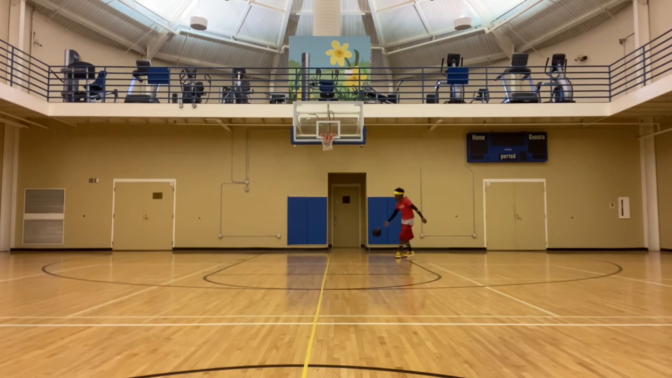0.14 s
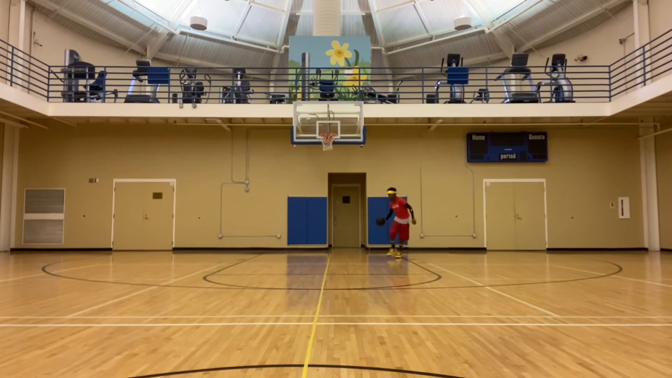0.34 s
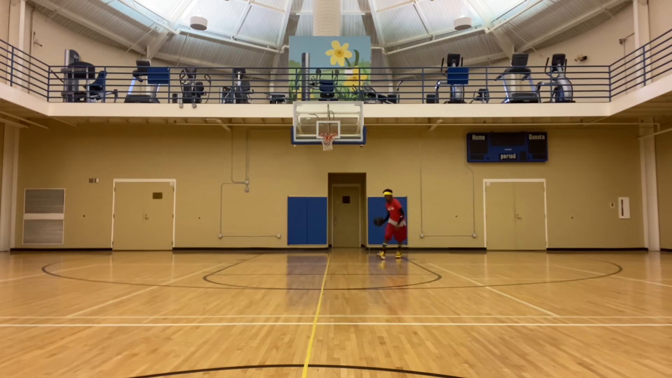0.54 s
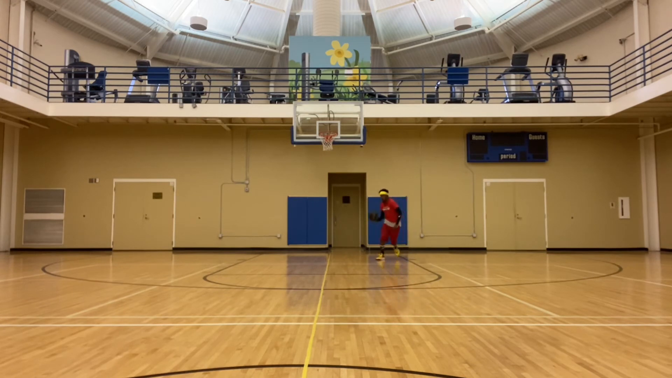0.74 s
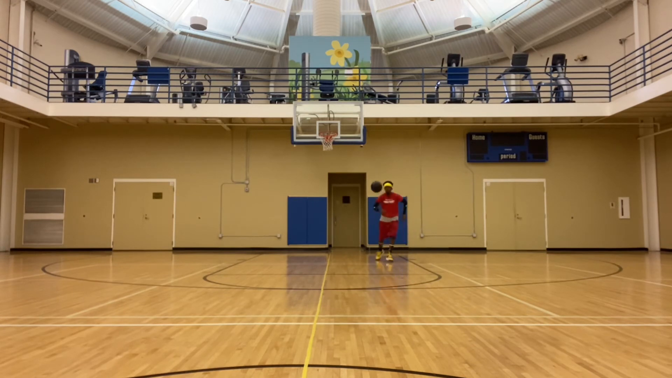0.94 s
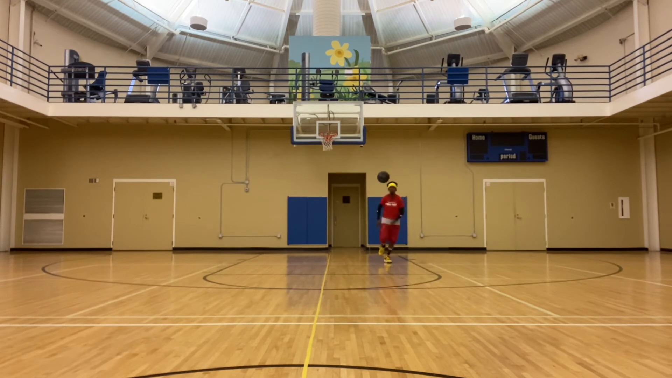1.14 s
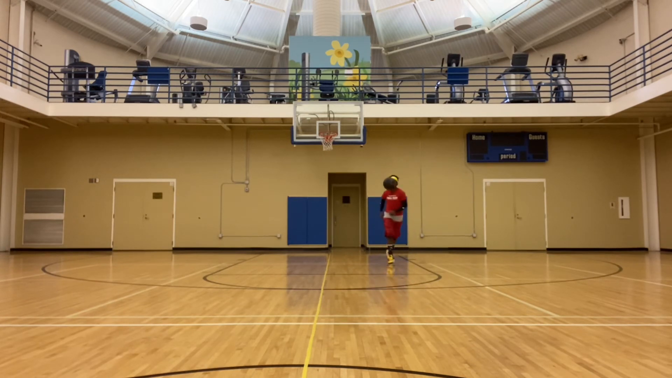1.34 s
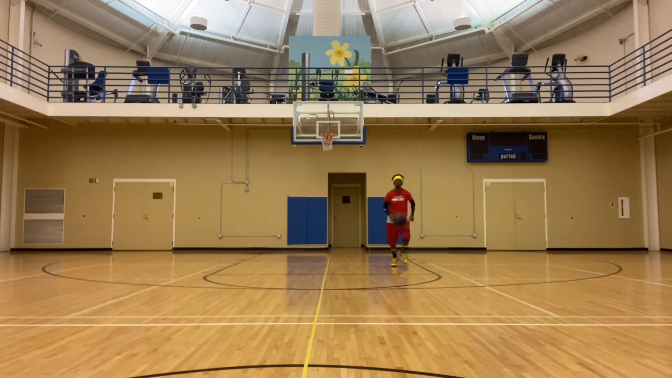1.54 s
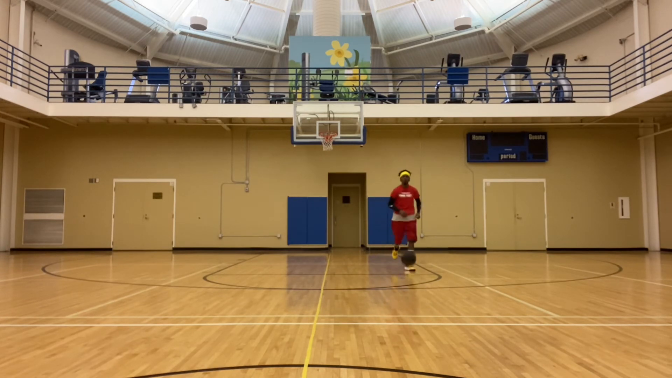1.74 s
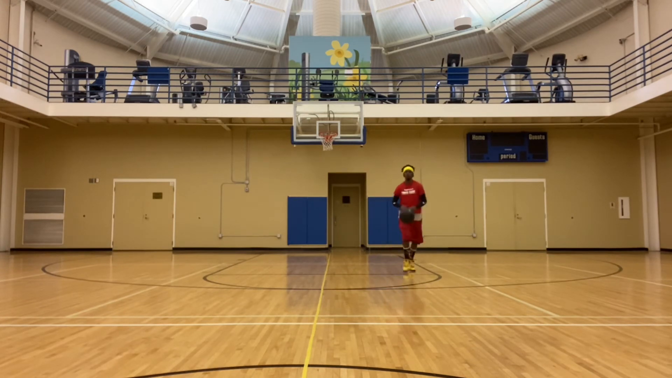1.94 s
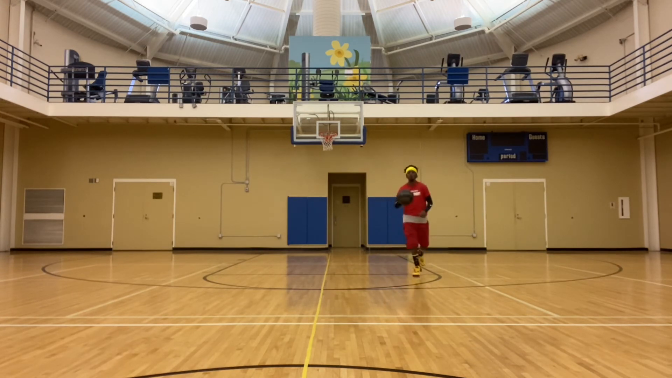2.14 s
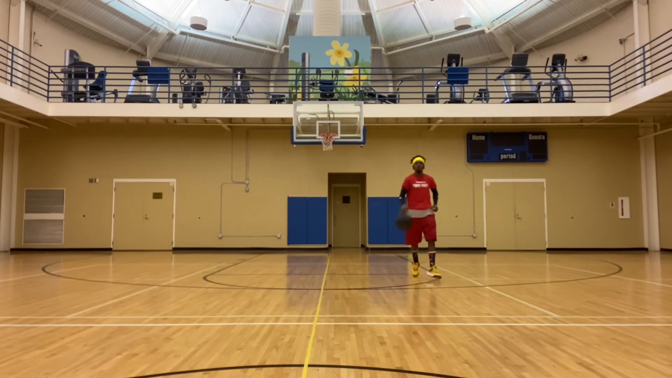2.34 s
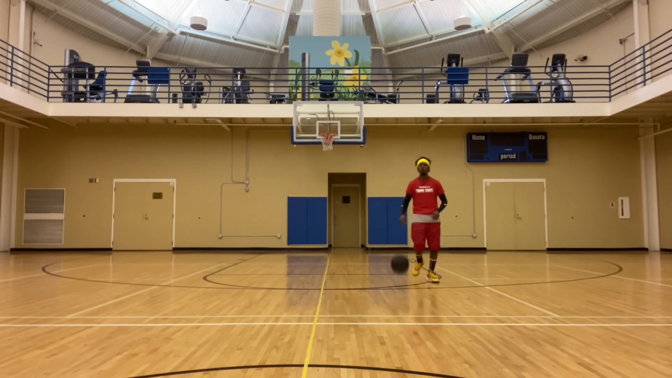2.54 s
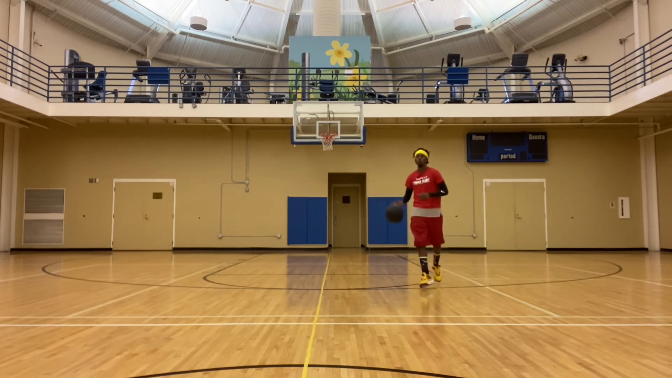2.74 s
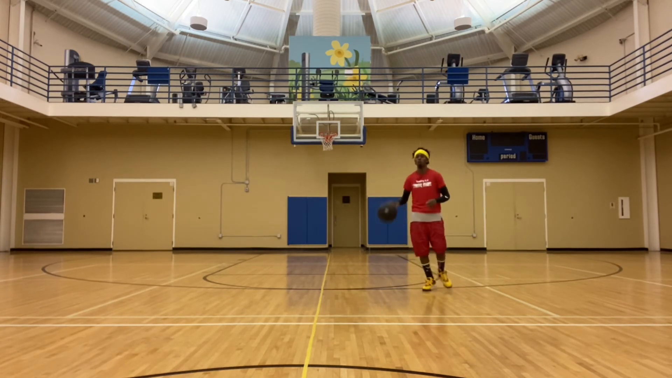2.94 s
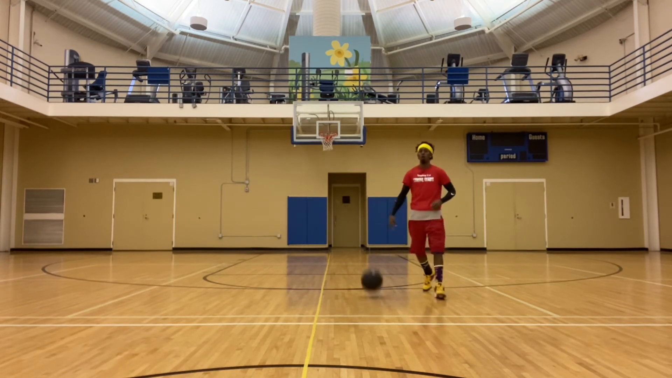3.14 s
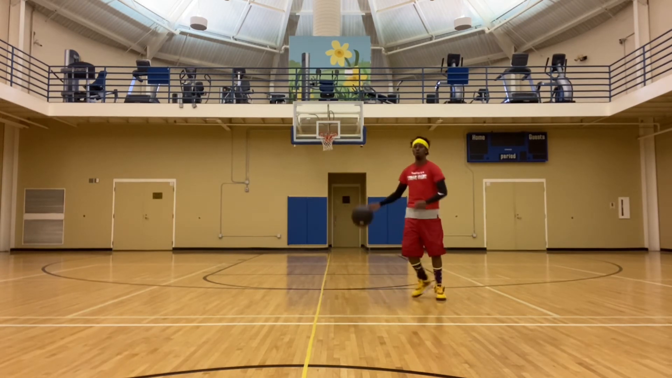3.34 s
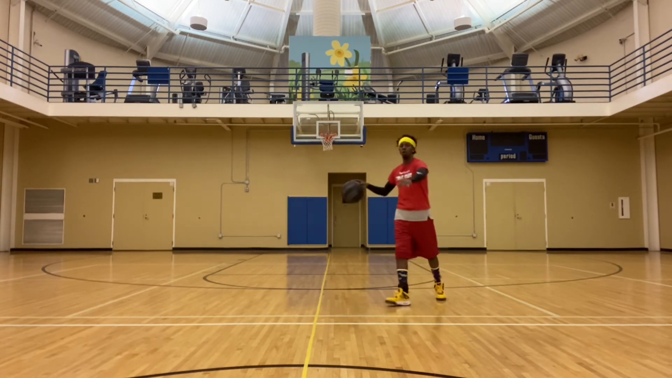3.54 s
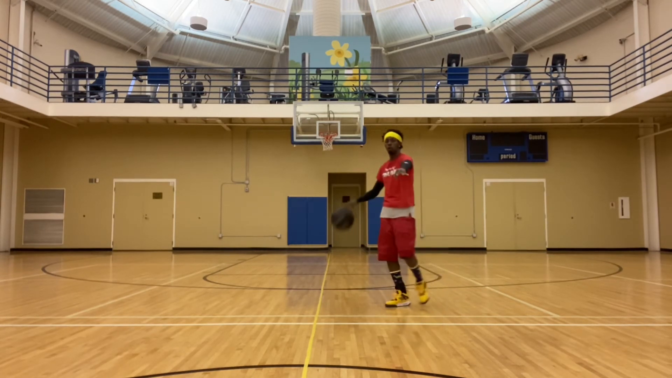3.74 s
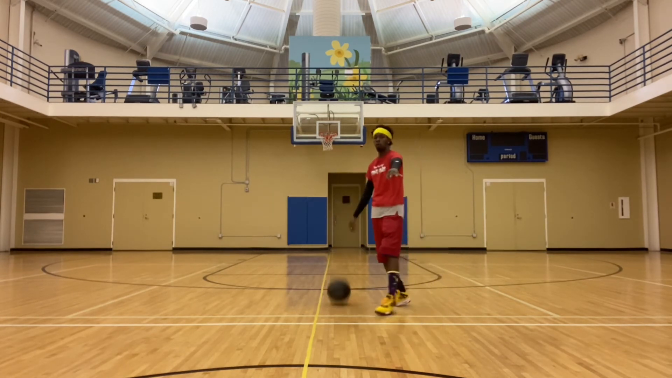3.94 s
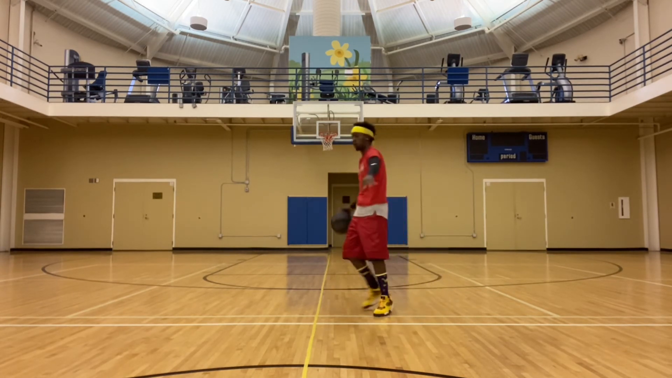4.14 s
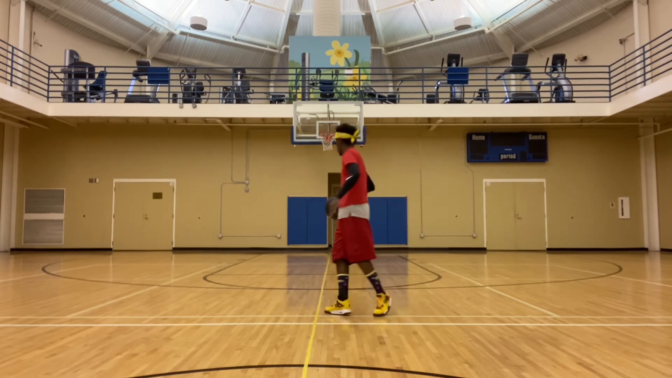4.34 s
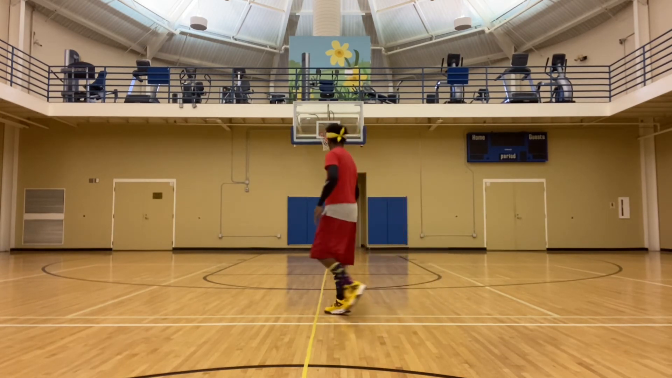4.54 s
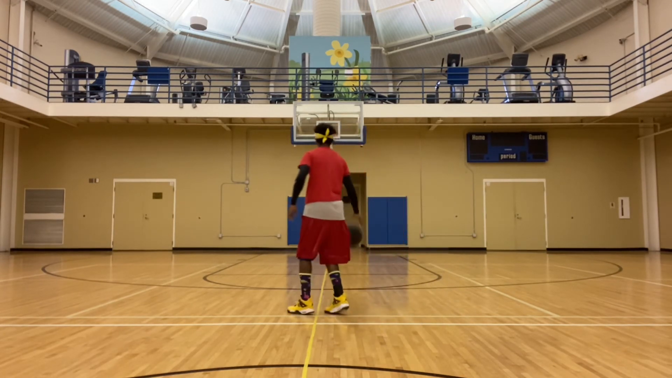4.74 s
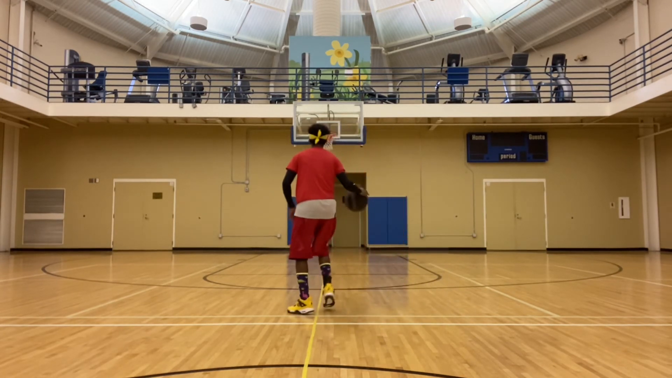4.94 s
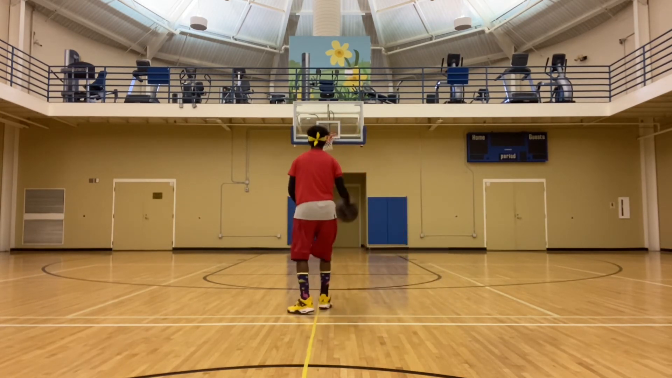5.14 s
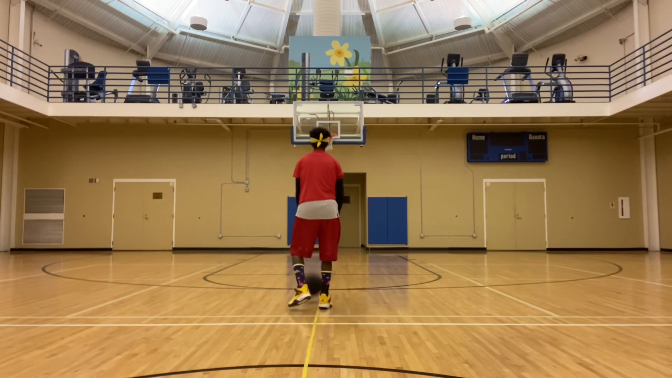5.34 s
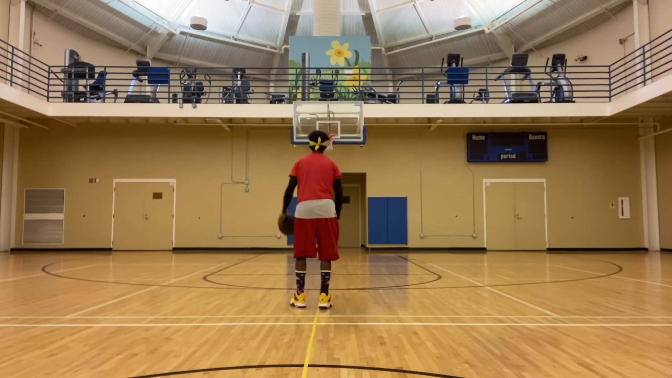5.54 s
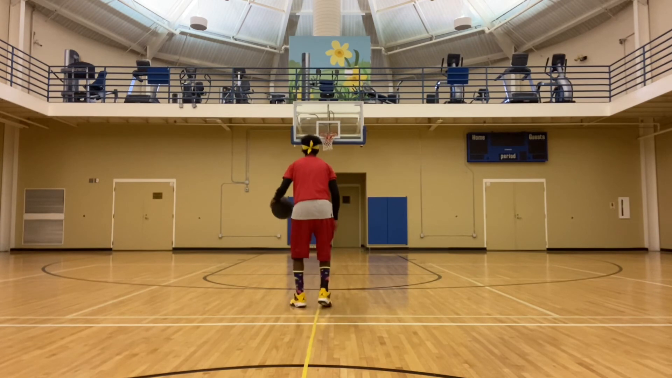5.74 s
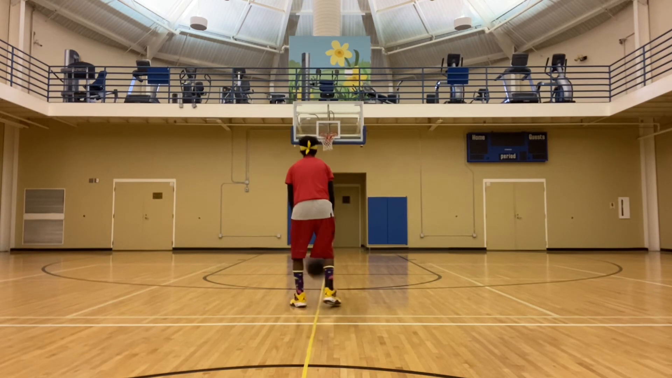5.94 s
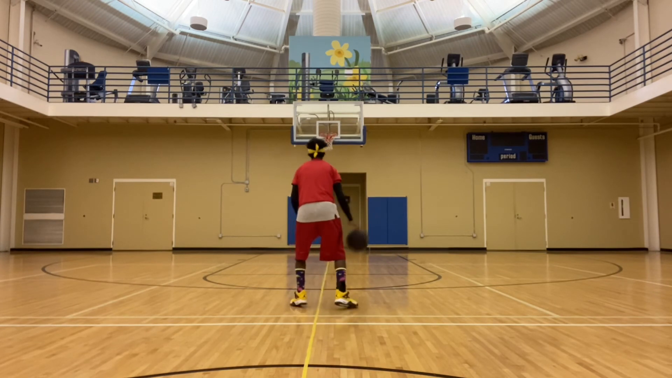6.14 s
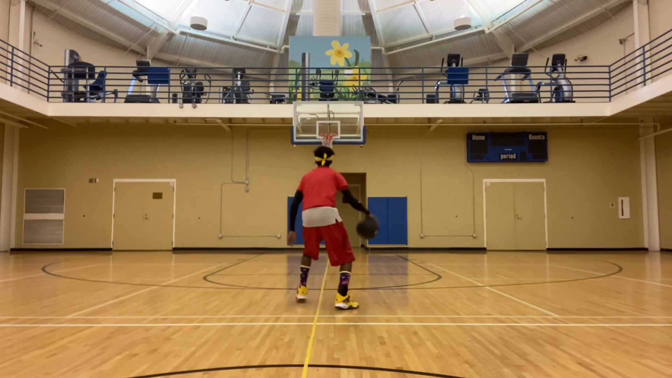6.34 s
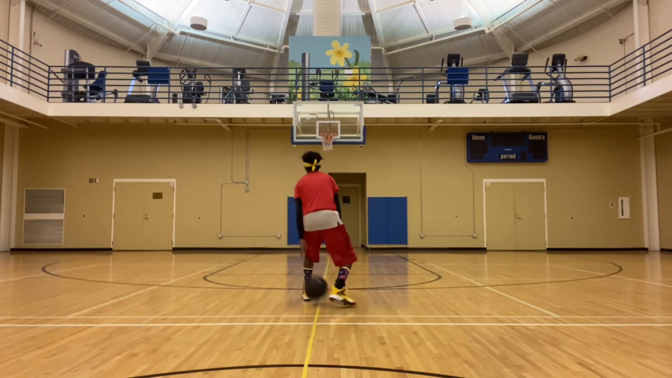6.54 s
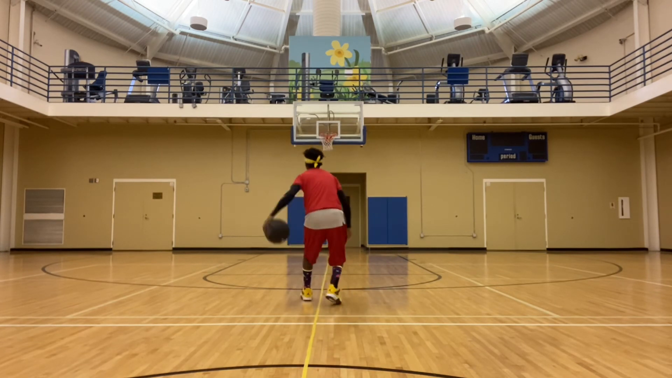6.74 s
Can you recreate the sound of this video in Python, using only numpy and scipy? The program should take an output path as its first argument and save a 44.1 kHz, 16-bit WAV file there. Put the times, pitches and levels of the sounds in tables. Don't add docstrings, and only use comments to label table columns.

```python
import sys
import numpy as np
from scipy import signal
from scipy.fft import rfft, irfft
from scipy.io import wavfile
from scipy.ndimage import uniform_filter1d

SR = 44100
rng = np.random.default_rng(int(sys.argv[2]) if len(sys.argv) > 2 else 0)


def output_pcm(signal):
    pcm = np.clip(np.atleast_2d(signal).T, -1, 1) * 32767
    wavfile.write(sys.argv[1], SR, np.round(pcm).astype(np.int16))


def natural_amplitude(level_db):
    exponent = np.asarray(level_db, float) / 20
    return 10 ** exponent


N = 303849

# start in seconds, slap level in dB, thump level in dB,
# level of the air ring in dB, pitch this bounce favours in Hz.
BOUNCES = [
    (1.6172, -10.5, -16, -23, 843),
    (2.4057, -8.5, -15.5, -27, 1100),
    (3.0276, -5, -15, -21, 1096),
    (3.818, -8, -14.5, -24, 980),
    (4.4843, -7.5, -14.5, -24.5, 1200),
    (5.227, -11.5, -17, -27, 1053),
    (5.898, -6, -16.5, -23, 1060),
    (6.4278, -3, -17.5, -30.5, 1230),
]
# start in seconds, bright tail in dB, boomy tail in dB.
WALL_ANSWERS = [
    (-.15, -34.5, -25.5),
    (1.643, -32, -20),
    (2.436, -34, -21.5),
    (3.062, -32.5, -20.5),
    (3.858, -36, -23.5),
    (4.52, -34.5, -23),
    (5.262, -37, -23),
    (5.933, -32.5, -23.5),
    (6.465, -36, -24),
]
# start in seconds, slap level in dB, ring level in dB.
END_WALL_ECHOES = [
    (1.679, -22, -33),
    (2.4705, -21.5, -32),
    (3.0992, -18, -22),
    (3.9028, -29, -25.5),
    (4.58, -22, -30),
    (5.326, -35, -31),
    (5.9794, -22.5, -21),
    (6.5088, -30, -29),
]
# start in seconds, peak in dB, centre in Hz,
# level of the bright part in dB, time to die by 60 dB in seconds.
TAPS = [
    (0.473, -35, 1010, -25, 0.0023),
    (1.286, -35.5, 1080, -24, 0.019),
    (1.333, -36.5, 1020, -20, 0.0032),
    (2.335, -27, 1050, -15, 0.012),
    (2.462, -22.5, 626, -30, 0.027),
    (2.679, -29, 1000, -26, 0.0052),
]
# centre in seconds, level in dB, length in seconds.
RUSTLES = [
    (1.203, -74, 0.02),
    (2.224, -73, 0.017),
    (3.751, -72, 0.03),
    (4.188, -65, 0.017),
    (4.953, -56, 0.013),
    (5.58, -77, 0.011),
]
# delay after the bounce in seconds, level against the thump in dB, pitch in Hz.
THUMP_RETURNS = [(0.071, -6, 81.2), (.111, -11, 81), (.141, -5.5, 82), (0.177, -10.5, 78),
                 (0.227, -8, 74.2), (0.282, -10.5, 64.7), (0.341, -17, 90), (.38, -10, 75.2),
                 (.42, -7.5, 74), (.469, -15, 77.3), (0.507, -13, 74.3), (.552, -16.5, 82.1)]

# pitch in Hz, level in dB, time to die by 60 dB in seconds.
BALL_AIR = [(982.6, 0.5, 0.046), (1198, -10, 0.034), (1568, -8, 0.038), (844, -4.5, 0.036),
            (557, -11, 0.029)]
BALL_SKIN = [(2000, -9, 0.0026), (3250, -1.5, 0.0019), (4930, 12, 0.00072), (7860, 3, 0.0018),
             (12450, -11, 0.00055)]
FIRST_TOUCH = [(4630, -4.5, 0.0006), (8100, 10, 0.00098), (12200, -11.5, 0.0014)]
SQUEEZED_AIR = [(2500, -1, 0.0011), (1480, -1, 0.0012)]
BOARDS = [(234, -20, .05), (338, 4, 0.065), (471, -6.5, 0.14), (596, -2, 0.072)]
FLOOR_BOOM = [(57.1, 0.5, 0.93), (70.5, -3.5, 1), (90, -4.5, 0.28)]

# pitch in Hz, level in dB per Hz.
TAIL_COLOUR = [(28, -24.5), (40, -21), (81, -6), (170, -8), (249, -16), (330, -21), (549, -30),
               (785, -38.5), (987, -36), (2000, -44.5), (4500, -46), (8000, -49), (12300, -60),
               (16000, -99)]
# pitch in Hz, time to die by 60 dB in seconds.
TAIL_T60 = [(40, 7), (110, 2.23), (280, 2.14), (740, 1.51), (1940, 1.825), (5120, 0.98), (9000, 0.58),
            (13500, 0.46)]
# pitch in Hz, likeness from 0 to 1.
LIKENESS = [(40, 1), (80, 0.95), (130, 0.55), (220, 0.65), (380, 0.31), (700, 0), (5000, 0), (9000, 0.36),
            (15000, 0.94)]
# pitch in Hz, level in dB per Hz.
VENTILATION = [(25, -30.5), (45, 2.5), (71, -0.5), (160, -3), (300, -15), (550, -23.5), (800, -30),
               (1210, -31.5), (1800, -43), (4000, -55.5), (8000, -60.5), (15000, -69.5)]

VENTILATION_DB = -41.5
PORT_LAG_MS = 0.044
EARLY_DB, EARLY_S, GRAIN_DB = 1, 0.023, 6
TAP_ROOM_DB, TAP_ROOM_S = -29, 0.03
TAP_ROOM_DULL_DB = -6.5
SETTLED_GAP_S = 0.03592


def at_hz(points, hz):
    pitches, values = np.array(points).T[:2]
    return np.interp(np.log(hz), np.log(pitches), values)


def ring(x, hz, t60):
    r = natural_amplitude(-60 / (max(t60, 2e-4) * SR))
    w = 2 * np.pi * hz / SR
    return signal.lfilter([0, np.sin(w)], [1, -2 * r * np.cos(w), r * r], x)


def struck(modes, spread_db, crackle, size=2000):
    blow = crackle * rng.standard_normal(size) * np.exp(-np.arange(size) / (0.0013 * SR))
    blow[0] -= 1
    sound = np.zeros(size)
    for hz, db, t60 in modes:
        sound += natural_amplitude(db + spread_db * rng.standard_normal()) * ring(blow, hz, t60)
    return sound / np.max(np.abs(sound))


def falling(start_hz, end_hz, fall_s, peak_s, sharp, turn):
    t = np.arange(3500) / SR
    turns = end_hz * t + (start_hz - end_hz) * fall_s * (1 - np.exp(-t / fall_s))
    swell = (t / peak_s * np.exp(1 - t / peak_s)) ** sharp
    return swell * np.cos(2 * np.pi * (turns + turn))


def add(out, sound, s, lag_ms=0., pan_db=0.):
    i = round(s * SR)
    lags = np.maximum([[lag_ms], [-lag_ms]], 0) / 1000
    delay = np.exp(-2j * np.pi * np.fft.rfftfreq(len(sound), 1 / SR) * lags)
    pair = irfft(rfft(sound) * delay, len(sound)) * natural_amplitude([[pan_db / 2], [-pan_db / 2]])
    out[:, i:i + len(sound)] += pair[:, :N - i]


def band(low, high):
    sieve = signal.butter(2, [low, high], "band", fs=SR, output="sos")
    mid, side = signal.sosfilt(sieve, rng.standard_normal((2, N + 4000)))[:, 4000:]
    alike = np.clip(at_hz(LIKENESS, np.sqrt(low * high)), -1, 1)
    pair = np.sqrt(1 + alike) * mid + np.sqrt(1 - alike) * side * np.array([[1], [-1]])
    return pair / np.sqrt(np.mean(pair ** 2))


def distance_loss_db(s, wall_s):
    return 0.1 * min(wall_s - s - SETTLED_GAP_S, 0) / 0.0014


def tail_power(t, low, high, hz, grain):
    boom = np.clip(np.log2(600 / hz) / 0.84, 0, 1)
    base_db = at_hz(TAIL_COLOUR, hz) - 17 * boom + 1.5 * (1 - boom)
    dull_db = TAP_ROOM_DULL_DB * max(np.log2(hz / 1500), 0)
    tap_answers = [(s + TAP_ROOM_S, db + TAP_ROOM_DB + dull_db, db + TAP_ROOM_DB) for s, db, *_ in TAPS]
    power = np.zeros(len(t))
    for s, bright_db, boom_db in WALL_ANSWERS + tap_answers:
        age = np.maximum(t - s, 0)
        early_db = np.exp(-age / EARLY_S) * (EARLY_DB + GRAIN_DB * grain)
        level_db = base_db + boom * boom_db + (1 - boom) * (bright_db + early_db)
        dying = natural_amplitude(level_db - 60 * age / at_hz(TAIL_T60, hz)) ** 2 * (high - low)
        power += dying * (1 - np.exp(-age / (0.0033 + 0.0051 * boom)))
    return power


def hall_and_ventilation():
    out = np.zeros((2, N))
    t = np.arange(0, N + 40, 40) / SR
    edges = 28 * 2 ** np.arange(0, 9.3, 0.4)
    centres, widths = np.sqrt(edges[1:] * edges[:-1]), np.diff(edges)
    colour = natural_amplitude(at_hz(VENTILATION, centres)) ** 2 * widths
    steady = natural_amplitude(VENTILATION_DB) ** 2 * colour / np.sum(colour[centres > 95])
    grain = rng.standard_normal(len(t))
    for low, high, hz, air in zip(edges, edges[1:], centres, steady):
        power = air + tail_power(t, low, high, hz, grain)
        patches = uniform_filter1d(rng.standard_normal(len(t)), size=36) * 6
        level = np.sqrt(power) * natural_amplitude(1.93 * patches)
        out += np.interp(np.arange(N) / SR, t, level) * band(low, high)
    return out


def floor_boom():
    t = np.arange(N) / SR
    level = np.zeros(N)
    for s, _, boom_db in WALL_ANSWERS:
        age = np.maximum(t - s, 0)
        level += natural_amplitude(boom_db - 8 - 60 * age / 3.5) * (1 - np.exp(-age / 0.1))
    push = band(50, 160)
    boom = sum(natural_amplitude(db) * ring(push, hz, t60) for hz, db, t60 in FLOOR_BOOM)
    return level * boom / np.std(boom)


def rustles():
    t = np.arange(N) / SR
    puffs = sum(natural_amplitude(db) * np.exp(-((t - s) / length) ** 2) for s, db, length in RUSTLES)
    return puffs * band(4000, 9200)


def taps():
    out = np.zeros((2, N))
    for s, peak_db, hz, bright_db, t60 in TAPS:
        knock = [(hz, 0, t60), (0.72 * hz, -4, t60), (1.27 * hz, -3, 0.95 * t60)]
        scuff = [(3000, bright_db, 0.003), (6000, bright_db, 0.0015)]
        sound = struck(knock + scuff, 1.5, crackle=2.5)
        soft = signal.lfilter([0.2], [1, -0.8], sound)
        add(out, natural_amplitude(peak_db + 1.5) * soft, s, PORT_LAG_MS)
    return out


def scattered_ring():
    t, level = np.arange(N) / SR, np.zeros(N)
    for s, bright_db, _ in WALL_ANSWERS:
        level += (t > s) * natural_amplitude(bright_db - 13.5 - 60 * np.maximum(t - s, 0) / 1.4)
    arrives = rng.random((2, N)) < 110 / SR
    clicks = arrives * rng.standard_normal((2, N)) * level + 1e-18
    out = sum(natural_amplitude(db) * ring(clicks, hz, 5 * t60) for hz, db, t60 in BALL_AIR)
    out += natural_amplitude(4) * ring(clicks[::-1], 521, 0.07)
    starts = [round(row[0] * SR) for row in BOUNCES] + [N]
    for i, j, (*_, ring_hz) in zip(starts, starts[1:], BOUNCES):
        out[:, i:j] += natural_amplitude(-0.5) * ring(clicks[:, i:j], ring_hz, 0.12)
    return out


def thump_returns():
    out = np.zeros((2, N))
    rise_s = 0.01328
    for (s, _, thump_db, *_), (wall_s, *_) in zip(BOUNCES, WALL_ANSWERS[1:]):
        shift = 1.5 * (wall_s - s - SETTLED_GAP_S)
        for after_s, db, hz in THUMP_RETURNS:
            start = s + after_s + shift - rise_s
            level = natural_amplitude(thump_db + db + 4.5 + 0.5 * rng.standard_normal())
            if start < N / SR:
                add(out, level * falling(hz, hz, 1, rise_s, sharp=3, turn=0), start, PORT_LAG_MS)
    return out


def wall_echoes():
    out = np.zeros((2, N))
    smeared = [(hz, db, 1.1 * t60) for hz, db, t60 in BALL_AIR[:2]]
    copies = []
    for s, bright_db, _ in WALL_ANSWERS[1:]:
        for k in (0, 1):
            copies.append((s + k * 0.0052, bright_db + 7 - 0.5 * k, bright_db - 15, -7))
    for s, slap_db, ring_db in END_WALL_ECHOES:
        for k in (-1, 0, 1):
            copies.append((s + k * 0.0045, slap_db - 12 * abs(k), ring_db - 3 * abs(k), -4.5))
    for s, slap_db, ring_db, pan_db in copies:
        lag_ms = rng.uniform(-0.2, 0.1)
        add(out, natural_amplitude(slap_db) * struck(BALL_SKIN, 2.7, crackle=0.71), s + 0.00035, lag_ms, pan_db)
        add(out, natural_amplitude(ring_db - 3.5) * struck(smeared, 2, crackle=0.6), s + 0.0015, lag_ms, pan_db)
    side_thump = falling(178.4, 178.4, 1, peak_s=0.01, sharp=1, turn=-0.27)
    for s, _, boom_db in WALL_ANSWERS[1:]:
        add(out, natural_amplitude(boom_db + 7.5) * side_thump, s - 0.004, lag_ms=-1.7)
    return out


def scattered_slap():
    out = np.zeros((2, N))
    fade = np.exp(-np.arange(2000) / (0.015 * SR))
    for s, slap_db, *_ in BOUNCES:
        hiss = signal.lfilter([1, -1], [1, -0.6], rng.standard_normal(2000)) * fade
        add(out, natural_amplitude(slap_db - 42) * hiss, s + 0.002, -PORT_LAG_MS)
    return out


def floor_thump(out, s, thump_db):
    add(out, natural_amplitude(thump_db - 5) * struck(BOARDS, 5.8, crackle=0.2), s + 0.004, -0.4)
    thump = falling(389.5, 81.2, fall_s=0.0052, peak_s=0.01, sharp=0.85, turn=-0.01)
    add(out, natural_amplitude(thump_db + 5) * thump, s + 0.0011, PORT_LAG_MS)


def lift_off(out, s, slap_db, ring_db, air_modes, far_db):
    lift_s = s + 0.011
    add(out, natural_amplitude(slap_db - 34.5 + far_db) * struck(BALL_SKIN, 3, crackle=1.6), lift_s, PORT_LAG_MS)
    add(out, natural_amplitude(ring_db + 4.5 + far_db / 2) * struck(air_modes, 2.5, crackle=1.6), lift_s + 0.001, PORT_LAG_MS)


def slap(out, s, slap_db, far_db):
    peak_ms = 0.071 + 0.12 * max(-11.5 - slap_db, 0)
    pulse = falling(15880, 1586, fall_s=0.000209, peak_s=peak_ms / 1000, sharp=0.4, turn=0.098)
    add(out, natural_amplitude(slap_db - 3.5) * pulse, s + 0.0007074, PORT_LAG_MS)
    add(out, natural_amplitude(slap_db + 3.5 + 0.57 * far_db) * struck(FIRST_TOUCH, 1.7, crackle=0.05), s + 0.0009)
    add(out, natural_amplitude(slap_db + 1) * struck(SQUEEZED_AIR, 1, crackle=0.02), s + 0.00135, PORT_LAG_MS)
    add(out, natural_amplitude(slap_db - 13) * struck(BALL_SKIN, 2.5, crackle=1.5), s + 0.0016, PORT_LAG_MS)


def ball():
    out = np.zeros((2, N))
    for (s, slap_db, thump_db, ring_db, ring_hz), (wall_s, *_) in zip(BOUNCES, WALL_ANSWERS[1:]):
        far_db = distance_loss_db(s, wall_s)
        squash = (ring_hz / 1050) ** 0.3
        shifted = [(hz * squash, db, t60) for hz, db, t60 in BALL_AIR[1:]]
        air_modes = BALL_AIR[:1] + shifted + [(ring_hz, 1.5, 0.012)]
        slap(out, s, slap_db, far_db)
        add(out, -natural_amplitude(ring_db + 10.5) * struck(air_modes, 0.75, crackle=0.065), s + 0.001586, PORT_LAG_MS)
        lift_off(out, s, slap_db, ring_db, air_modes, far_db)
        floor_thump(out, s, thump_db)
    return out


def scene():
    background = hall_and_ventilation() + floor_boom() + rustles() + taps()
    answers = scattered_ring() + thump_returns() + wall_echoes() + scattered_slap()
    return background + answers + ball()


def low_pass(x):
    return signal.sosfilt(signal.butter(12, 16560, fs=SR, output="sos"), x)


def record(dry):
    mid, side = (dry[0] + dry[1]) / 2, (dry[0] - dry[1]) / 2
    mid = signal.lfilter(*signal.iirnotch(10450, 3.2, fs=SR), mid)
    for hz, q in [(8400, 7), (13200, 5)]:
        side = signal.lfilter(*signal.iirnotch(hz, q, fs=SR), side)
    x = np.array([mid + side, mid - side]) * natural_amplitude([[-0.3], [0.3]])
    x = signal.sosfilt(signal.butter(3, 42, "high", fs=SR, output="sos"), x)
    x = signal.sosfilt(signal.butter(8, 14000, fs=SR, output="sos"), x)
    return low_pass(x)


dry = scene()
out = record(dry)
output_pcm(out)
```